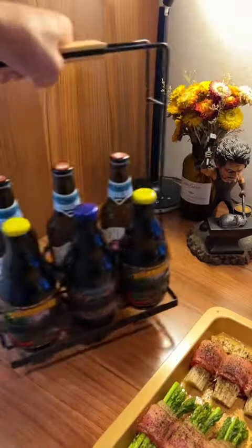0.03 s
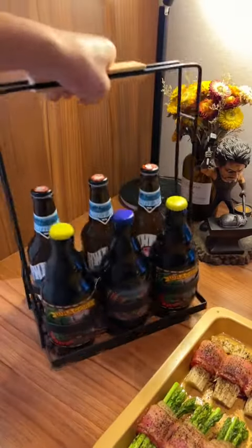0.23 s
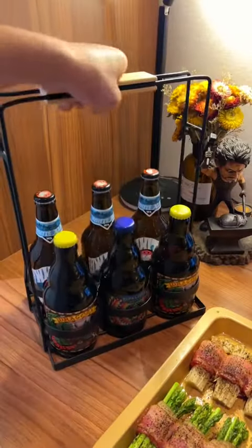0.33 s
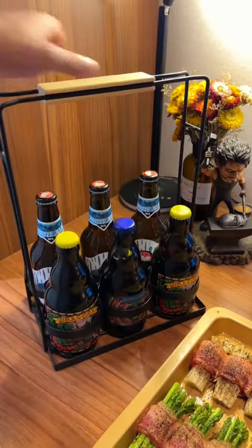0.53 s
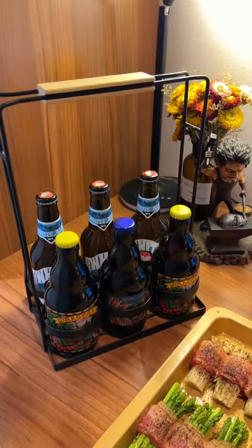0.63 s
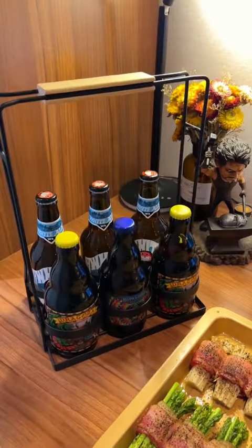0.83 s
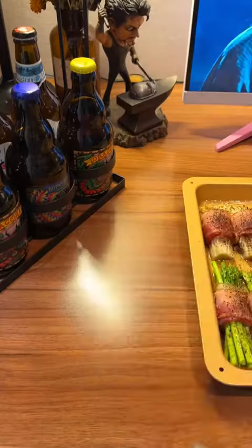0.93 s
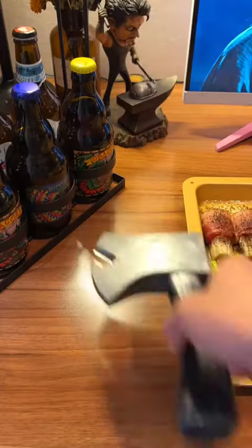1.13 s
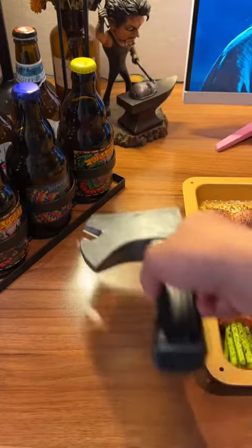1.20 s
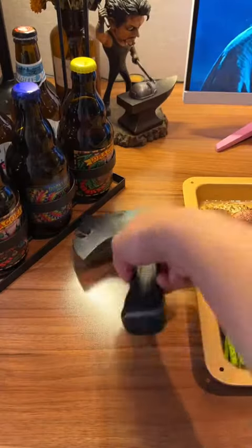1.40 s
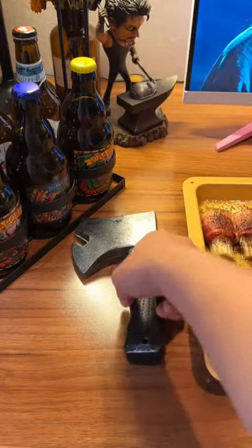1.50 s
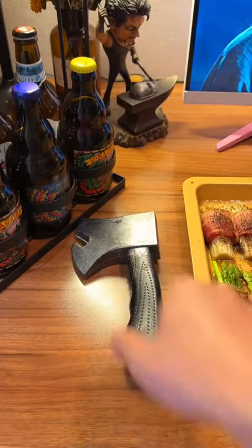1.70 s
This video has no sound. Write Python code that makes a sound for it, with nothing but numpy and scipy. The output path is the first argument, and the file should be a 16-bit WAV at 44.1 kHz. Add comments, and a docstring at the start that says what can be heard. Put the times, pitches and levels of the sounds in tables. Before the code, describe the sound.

A wire carrier of glass bottles knocks down on a wooden table with faint clinks and rocks to rest in deep thumps. Then a steel axe clatters onto the table, ringing briefly, close to the microphone in a small room.

```python
"""Glass bottles clink faintly, then their wire carrier knocks twice on a wooden table and rocks to rest.
Each landing knocks the wood and excites the damped modes of frame and table; the bottles clink now and
then, and the rocking flexes the table top in deep thumps. The ringing stops abruptly; then a steel axe
lands on the same table and clatters flat.
A small room reverberates and hums; the loudest peaks overload the close microphone a little."""
import sys
import numpy as np
from scipy import signal
from scipy.io import wavfile

SR = 44100
rng = np.random.default_rng(int(sys.argv[2]) if len(sys.argv) > 2 else 0)


def master(y):
    """Save y as 16-bit WAV."""
    cut = np.clip(np.atleast_2d(y).T, -1, 1)
    pcm = np.round(cut * 32767)  # scale
    wavfile.write(sys.argv[1], SR, pcm.astype(np.int16))


N = 77175
TIME = np.arange(N) / SR
BANDS_HZ = 23.6 * 2 ** (np.arange(29) / 3)

# Impacts of the carrier, and of the axe's head and handle. Each row: start in seconds, level in dB,
# then bass tilt, treble tilt, crack and clack in relative dB, and clack pitch in Hz.
CARRIER_IMPACTS = [(.0, -48, -11, 6, -21, -6.5, 1300), (.238, -13.5, 0.5, 5.5, 4, 3, 5120),
                   (.26, -19, 6.5, 9, -26, 18, 596), (.319, -14.5, 2.5, 0.5, -31, 9, 2182),
                   (.385, -21.5, -14.5, -4, -36, 1, 1650), (.455, -39.5, 18, -35, -37, 15, 1430),
                   (.56, -43, 16.5, -17, -24.5, -3, 706), (.648, -42, 9, -16, -45, 10, 1150)]
AXE_IMPACTS = [(1.3398, -17, 9, 4, 14.5, 4.5, 1053), (1.359, -19, 13, -43, 0, 14.5, 313),
               (1.3752, -22.5, 2, 8, 7.5, 18, 510), (1.393, -20.5, 15, 7, 6, 7, 3350),
               (1.4068, -14.5, -4, -11, -2, 5, 777), (1.425, -17.5, -8, 2, -15, 9, 2690),
               (1.436, -11, -25, 3.5, -14, 5.5, 3730), (1.4638, -15, 5, -4.5, -18, 8.5, 2160)]
# The table top flexes under the rocking carrier. Each row: start in seconds, level in dB, pitch in Hz.
TABLE_FLEXES = [(0.242, -9, 102), (.33, -5, 87), (.365, -4.5, 89.2), (.423, -3, 85.5), (0.542, -14.5, 92),
                (0.574, -9.5, 93.4), (0.635, -10, 97.2), (0.711, -11, 97), (0.755, -22, 101.5),
                (0.789, -18, 96.2), (0.831, -20.5, 107.4), (0.869, -26, 108.3)]
# Bottles collide. Each row: start in seconds, level in dB, pitch in Hz, 60 dB decay time in seconds.
BOTTLE_CLINKS = [(.0, -36, 2800, 0.16), (.0, -52.5, 2836, 0.63), (0.231, -12, 2601, 0.078),
                 (.385, -39.5, 4560, 0.31), (.4, -34.5, 2820, 0.6), (.44, -37.5, 2917, 0.55),
                 (.652, -42, 1980, 0.12)]
# Modes of a bottle. Each row: frequency as a multiple of its pitch, relative level in dB.
GLASS_MODES = [(.585, -9), (1, 5), (1.21, -9), (1.62, -14.5), (2.1, -22.5), (2.57, -30.5)]
# Modes of the wire frame, the axe, the table and the hard contact itself.
# Each row: frequency in Hz, relative level in dB, 60 dB decay time in seconds.
FRAME_MODES = [(608, -21, 1.45), (648, -30.5, 1.17), (695, -33.5, 1.3), (917, -32, 2), (966, -38, 2.2),
               (1043, -28.5, 0.76), (1304, -35.5, 0.51), (1596, -22.5, 0.84), (1710, -29, 0.61),
               (1820, -24.5, 0.42), (2160, -14, 0.27), (2315, -22.5, .2), (3230, -30, 0.13),
               (3530, -33, .5)]
AXE_MODES = [(638, -31, 0.56), (723.5, -32, 0.85), (802, -21, 0.16), (940, -37, 1), (934, -20.5, 0.32),
             (1068, -24, 0.38), (1094, -18.5, 0.4), (1370, -31.5, 0.69), (1544, -28, 0.36),
             (1705, -23, 0.37), (2190, -27.5, 0.32), (2464, -28.5, 0.48), (2567, -33.5, .6),
             (3750, -32, 0.43)]
TABLE_MODES = [(157, -25, 0.18), (199.5, -23, 0.85), (220.2, -27.5, .7), (259.8, -21, 0.37),
               (321.1, -30, 2.02), (339, -19.5, 0.23), (382.5, -34.5, 0.49), (447, -37, 0.76),
               (458, -35.5, 0.16), (566, -20, 0.59)]
CONTACT_MODES = [(703, -11.5, 0.0061), (1190, -8, 0.039), (2030, -3, 0.011), (3700, -6.5, 0.0085),
                 (5380, 10, 0.0017), (6160, 1, 0.003), (9240, -8.5, .003)]
# Spectra of the knocks. Each row: frequency in Hz, relative level in dB per third octave.
CARRIER_SPECTRUM = [(50, -29.5), (100, -7.5), (180, -3.5), (350, -6), (600, -4), (1200, -5), (2300, -1),
                    (3500, -9), (6000, -10.5), (9800, -20), (12000, -38.5)]
AXE_SPECTRUM = [(50, -37), (100, -18), (220, -7.5), (500, -4.5), (1050, -1.5), (1450, -5.5), (2200, -3.5),
                (3100, -9.5), (3900, -9), (6500, -13.5), (9800, -23), (12000, -30)]
# Reverberation of the room. Each row: frequency in Hz, 60 dB decay time in seconds.
REVERB_T60 = [(100, .5), (300, 0.47), (1000, .42), (2500, .37), (5000, 0.29), (10000, 0.2)]
# Stereo width. Each row: frequency in Hz, side minus mid in dB.
STEREO_WIDTH = [(60, -18.5), (150, -27.5), (350, -13.5), (700, -1), (1400, -11), (2800, -5.5), (5600, -7.5),
                (10000, 10)]
# Stereo balance. Each row: frequency in Hz, left minus right in dB.
STEREO_BALANCE = [(60, 0.8), (150, 0.9), (350, 2.5), (700, 1.4), (1400, 0), (2800, 0.6), (5600, -0.5)]
# The room's steady noise. Each row: frequency in Hz, level in dB per third octave.
NOISE_SPECTRUM = [(25, -69.5), (45, -76.5), (62, -40), (85, -50), (160, -59.5), (320, -63.5), (600, -70),
                  (1600, -68.5), (2200, -65.5), (3200, -74), (6300, -73), (9500, -84), (12000, -105)]
# Tones of the hum. Each row: frequency in Hz, rms level in dB.
HUM_TONES = [(59.5, -43.5), (339, -82), (2186, -67.5)]


def carrier(frame_db=9, table_db=8, rock_table_db=-3, fade_from_s=.83, fade_db_per_s=253):
    """Impact excitation: each landing sets frame and table ringing; the frame's ring ends quickly."""
    wood = knocks(CARRIER_IMPACTS, CARRIER_SPECTRUM, knock_t60=.033, room_db=-5.5)
    landings = CARRIER_IMPACTS[1:]   # the first jostle happens in the air
    fade_db = fade_db_per_s * np.maximum(TIME - fade_from_s, 0)
    frame = from_db(frame_db - fade_db) * struck(landings, FRAME_MODES)
    # Rocking is too soft a contact to excite the table's higher modes much.
    soft_contact = signal.butter(2, 263, fs=SR, output="sos")
    rocked = signal.sosfilt(soft_contact, struck(TABLE_FLEXES, TABLE_MODES))
    table = from_db(table_db) * struck(landings, TABLE_MODES) + from_db(rock_table_db) * rocked
    return wood + cracks(landings) + frame + table + clinks() + rocking()


def axe(steel_db=10, table_db=9):
    """Action and reaction: each blow of the clatter excites both the steel and the table."""
    wood = knocks(AXE_IMPACTS, AXE_SPECTRUM, knock_t60=.041, room_db=-9.5)
    steel = from_db(steel_db) * struck(AXE_IMPACTS, AXE_MODES)
    table = from_db(table_db) * struck(AXE_IMPACTS, TABLE_MODES)
    return wood + cracks(AXE_IMPACTS) + steel + table


def knocks(hits, spectrum, knock_t60, room_db, room_build_s=.0091, bass_hz=640, treble_hz=1910):
    """Modal overlap: dense wood modes merge into a burst of noise, followed by the room's tail."""
    out = np.zeros((2, N))
    starts, db, bass_db, treble_db = np.transpose(hits)[:4]
    build = np.exp(-1 / (room_build_s * SR))
    for hz in BANDS_HZ[3:-1]:
        low, high = np.clip([np.log2(bass_hz / hz), np.log2(hz / treble_hz) / 2], 0, 1)
        band_db = db + low * bass_db + high * treble_db + at_hz(spectrum, hz)
        energy = np.zeros(N)
        energy[(starts * SR).astype(int)] = from_db(band_db) ** 2
        tail = signal.lfilter([1 - build], [1, -build], dissipate(energy, at_hz(REVERB_T60, hz)))
        envelope = np.sqrt(dissipate(energy, knock_t60) + from_db(room_db) ** 2 * tail)
        mid, side = third_octave(envelope * rng.standard_normal((2, N)), hz)
        out += stereo(mid, side, hz)
    return signal.sosfilt(signal.ellip(8, .5, 60, 10200, fs=SR, output="sos"), out)


def cracks(hits, snap_db=2, clack_rise_s=.0006, clack_t60=.034):
    """Contact transients: a hard blow gives a broad crack and a short clack of the part that hits."""
    contacts = [(start, db + crack_db + snap_db) for start, db, _, _, crack_db, _, _ in hits]
    out = struck(contacts, CONTACT_MODES, rise_s=.00018, wavering=False)
    for start, db, _, _, _, clack_db, hz in hits:
        envelope = decay(start, clack_t60) - decay(start, clack_rise_s * np.log(1000))
        out += from_db(db + clack_db) * envelope * np.sin(2 * np.pi * hz * (TIME - start))
    return out


def rocking(rise_s=.0051, t60=.28, low_cut_hz=48):
    """Flexural vibration: the table top thumps, on the whole weaker and higher as the carrier settles."""
    out = np.zeros(N)
    for start, db, hz in TABLE_FLEXES:
        age = np.maximum(TIME - start, 0)
        envelope = (1 - np.exp(-age / rise_s)) * decay(start, t60)
        out += from_db(db) * envelope * np.sin(2 * np.pi * hz * age)
    return signal.sosfilt(signal.butter(2, low_cut_hz, "high", fs=SR, output="sos"), out)


def clinks():
    """Similarity: the bottles share their mode ratios, each at a pitch of its own."""
    out = np.zeros((2, N))
    for start, db, hz, t60 in BOTTLE_CLINKS:
        modes = [(hz * ratio, mode_db, t60) for ratio, mode_db in GLASS_MODES]
        out += struck([(start, db)], modes, rise_s=.0032)
    return out


def struck(hits, modes, rise_s=.0022, uneven_db=1, wavering=True):
    """Modal superposition: each blow excites the given resonances with slightly random strengths."""
    out = np.zeros((2, N))
    starts, db = np.transpose(hits)[:2]
    onsets = np.clip(starts * SR, 0, N - 1).astype(int)
    rise = np.exp(-1 / (rise_s * SR))
    for hz, mode_db, t60 in modes:
        impulses = np.zeros(N)
        impulses[onsets] = from_db(db + mode_db + uneven_db * rng.standard_normal(len(starts)))
        pole = np.exp((-np.log(1000) / t60 + 2j * np.pi * hz) / SR)
        ring = signal.lfilter([1 - rise], np.poly([pole, pole * rise]), impulses + 1e-18)
        if wavering:
            ring *= waver()
        out += stereo(ring.imag, ring.real * rng.choice([-1, 1]), hz)
    return out


def waver(depth=.46, corner_hz=7.8, step=100):
    """Random modulation: a complex gain drifts around 1, varying a mode's amplitude and phase."""
    grid = np.arange(0, N + step, step)
    pole = np.exp(-2 * np.pi * corner_hz * step / SR)
    noise = rng.standard_normal((2, 2 * len(grid)))
    slow = signal.lfilter([1], [1, -2 * pole, pole ** 2], noise)[:, len(grid):]
    drift = np.interp(np.arange(N), grid, slow[0] + 1j * slow[1])
    return 1 + depth * drift / np.sqrt(2 * np.mean(slow ** 2))


def background():
    """Stationary sound: broadband room noise lies under the pure tones of a hum."""
    air = np.zeros((2, N))
    for hz in BANDS_HZ:
        mid, side = third_octave(rng.standard_normal((2, N + SR // 2)), hz)[:, -N:]
        air += from_db(at_hz(NOISE_SPECTRUM, hz)) * stereo(mid, side, hz)
    hum = sum(from_db(db) * np.sin(2 * np.pi * (hz * TIME + rng.random())) for hz, db in HUM_TONES)
    return air + np.sqrt(2) * hum


def decay(start, t60):
    """Exponential damping: amplitude starts at 1 and falls 60 dB every t60 seconds."""
    return (TIME >= start) * from_db(-60 * np.clip((TIME - start) / t60, 0, 4))


def dissipate(energy, t60):
    """Leaky integration: the energy of the blows adds up and drains by 60 dB every t60 seconds."""
    return signal.lfilter([1], [1, -np.exp(-2 * np.log(1000) / t60 / SR)], energy + 1e-18)


def stereo(mid, side, hz):
    """Mid-side stereo: sum and difference give left and right, widest in the high treble."""
    sign = np.array([[1], [-1]])
    balance = from_db(sign * at_hz(STEREO_BALANCE, hz) / 2)
    return (mid + from_db(at_hz(STEREO_WIDTH, hz)) * side * sign) * balance


def third_octave(x, hz):
    """Constant-Q filtering: one third-octave band, scaled to keep unit white noise at rms 1."""
    low, high = hz / 2 ** (1 / 6), hz * 2 ** (1 / 6)
    sos = signal.butter(3, [low, high], "band", fs=SR, output="sos")
    return signal.sosfilt(sos, x + 1e-18) * np.sqrt(SR / 2 / (high - low))


def at_hz(points, hz):
    """Logarithmic interpolation: a table is read on an axis of equal octaves."""
    frequencies, values = np.transpose(points)
    return np.interp(np.log(hz), np.log(frequencies), values)


def from_db(db):
    """The decibel scale: 20 dB is a factor of ten in amplitude."""
    return 10 ** (np.asarray(db) / 20)


def scene(stop_s=.896, stop_fade_s=.002):
    """Superposition: the carrier, which stops abruptly, and then the axe add to the background."""
    gate = np.clip((stop_s - TIME) / stop_fade_s, 0, 1)
    return carrier() * gate + axe() + background()


def record(dry, ceiling=.83, knee=3.7, stopband_hz=17300):
    """Saturation: the overloaded microphone rounds the peaks; a low-pass removes the highest treble."""
    rounded = dry / (1 + np.abs(dry / ceiling) ** knee) ** (1 / knee)
    return signal.sosfilt(signal.cheby2(12, 70, stopband_hz, fs=SR, output="sos"), rounded)


dry = scene()
out = record(dry)
master(out)
```